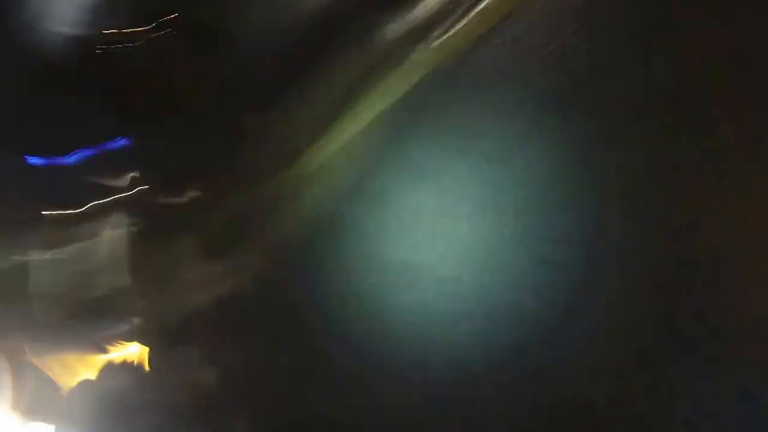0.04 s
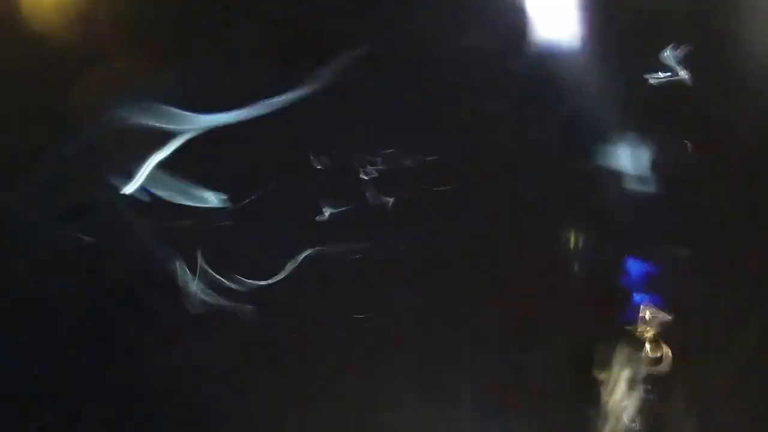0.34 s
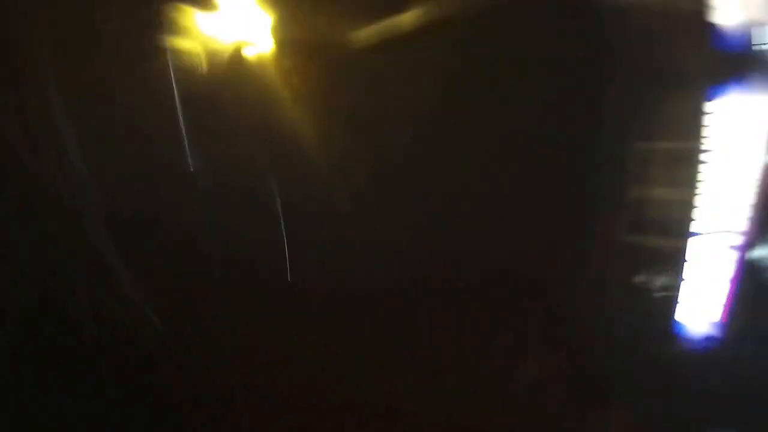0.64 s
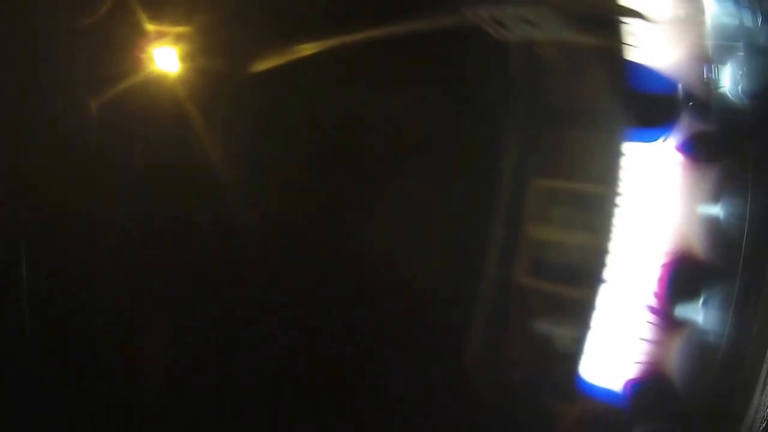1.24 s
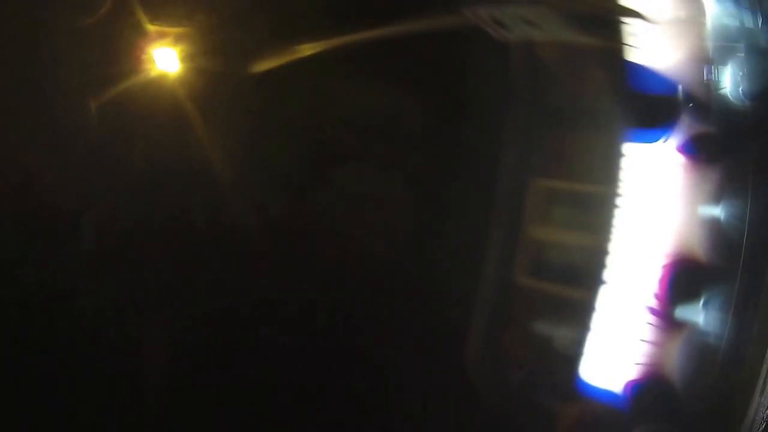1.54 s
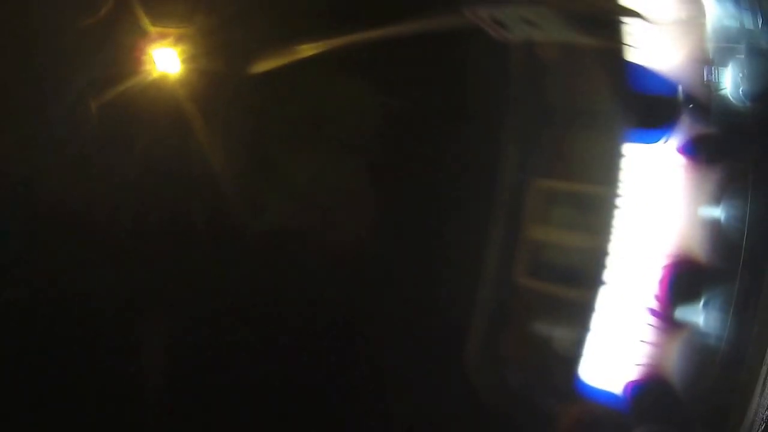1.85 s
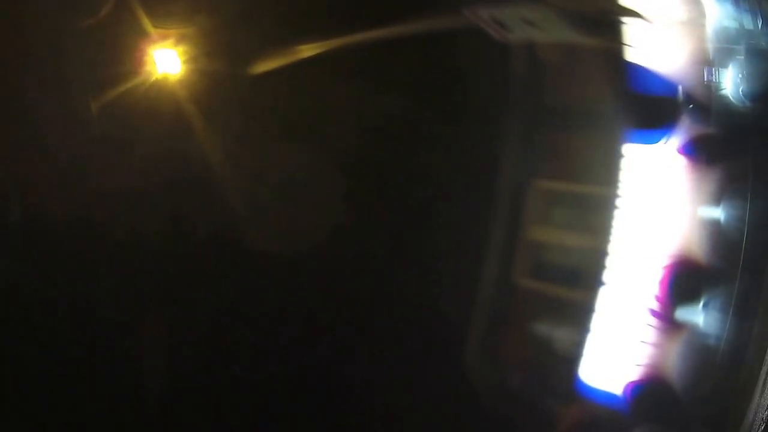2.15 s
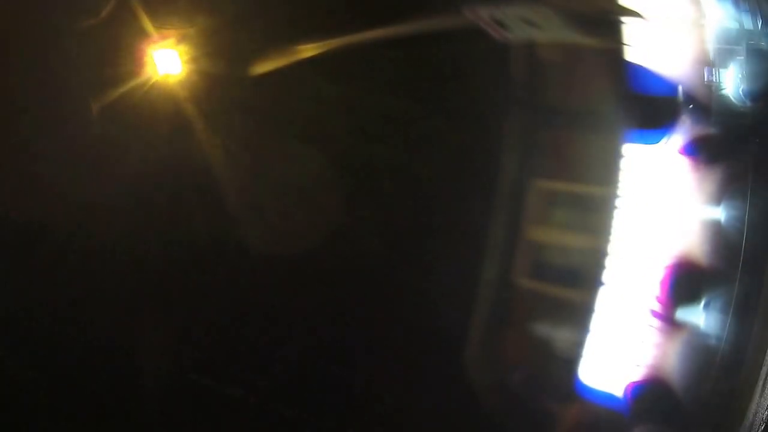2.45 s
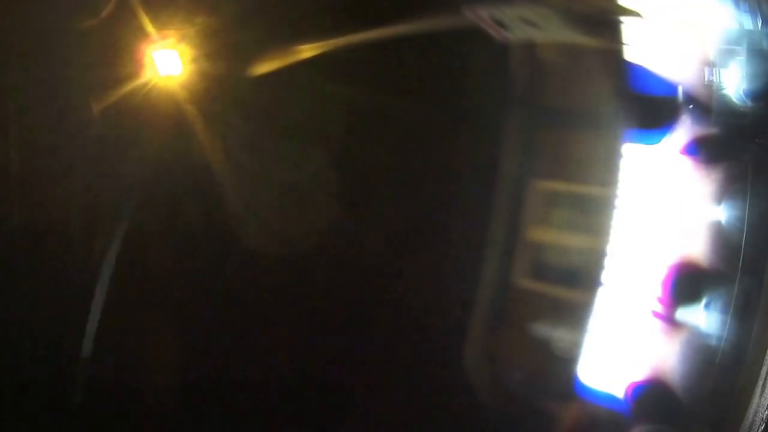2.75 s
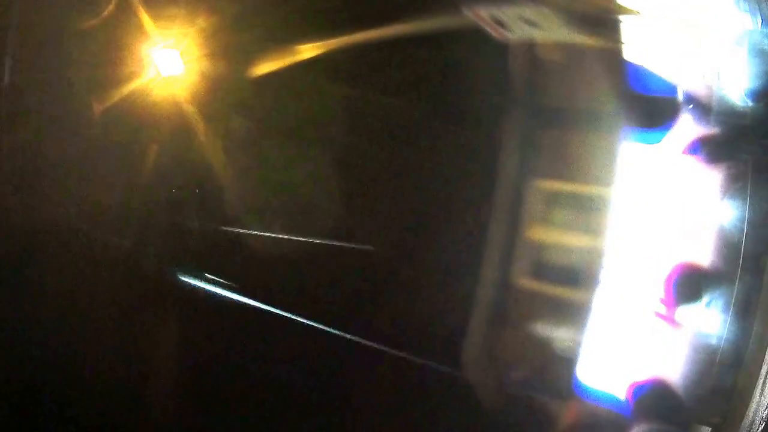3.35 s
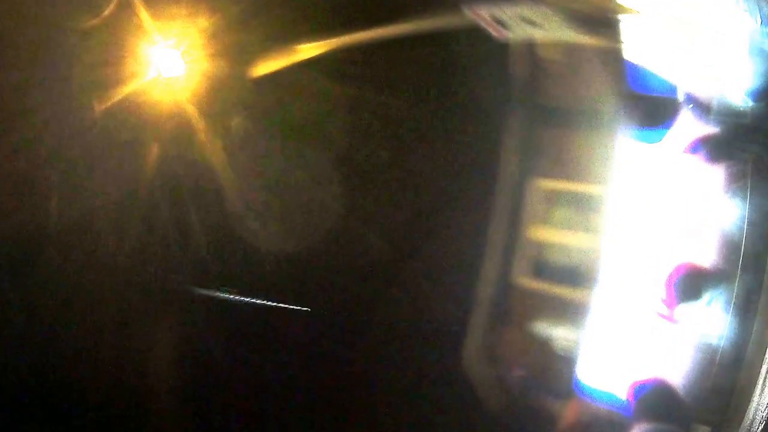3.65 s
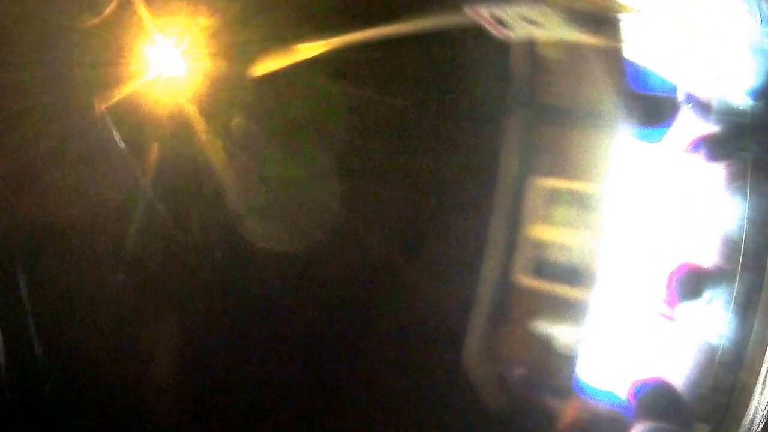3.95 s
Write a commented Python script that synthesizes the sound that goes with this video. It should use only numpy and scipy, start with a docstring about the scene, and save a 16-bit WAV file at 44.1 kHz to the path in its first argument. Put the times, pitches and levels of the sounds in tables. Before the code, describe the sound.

A bicycle crashes with loud thuds, clattering and scraping, leaving faint distant traffic.

```python
"""A bicycle carrying a camera crashes on a road at night. A brake howls for an instant, then bike and
camera tumble: heavy hits thud, the plastic case knocks and rings, grit scrapes and loose parts shudder,
all sliding to rest in about a second. A wheel ticks softly as it slows, and faint traffic is left:
tyres, a distant motor's drone, one engine rising and falling, and a thin high chirping."""
import sys
import numpy as np
from scipy import signal
from scipy.fft import rfft, irfft, next_fast_len
from scipy.io import wavfile
from scipy.ndimage import uniform_filter1d, map_coordinates

SR = 44100
rng = np.random.default_rng(int(sys.argv[2]) if len(sys.argv) > 2 else 0)


def store_pcm(level_fs):
    """Save levels as 16-bit WAV."""
    pcm = np.round(np.clip(level_fs, -1, 1) * 32767).astype(np.int16)
    wavfile.write(sys.argv[1], SR, np.atleast_2d(pcm).T)


N = 176400


def amp(db):
    """Turn decibels into a number to multiply by."""
    return 10 ** (np.asarray(db) / 20)


def unit(x):
    """Scale x to an average strength (rms) of 1."""
    return x / np.sqrt(np.mean(x ** 2) + 1e-20)


def clock(seconds=N / SR):
    """The time of each sample."""
    return np.arange(round(seconds * SR)) / SR


def curves(rows):
    """Join a table's rows with straight lines: one curve for each column after the time."""
    times, *columns = np.transpose(rows)
    return [np.interp(clock(), times, column) for column in columns]


def wobble(rate):
    """A smooth random curve through `rate` points a second."""
    return map_coordinates(rng.standard_normal(N // 8), [clock() * rate], mode="wrap")


def colour(x, tone):
    """Make each pitch in x louder or softer as a tone table says, at strength 1."""
    pitches, db = np.transpose(tone)
    hz = np.fft.rfftfreq(N, 1 / SR)
    gain = amp(np.interp(np.log(hz + 1), np.log(pitches), db))
    return unit(irfft(rfft(x) * gain, N))


def noise(tone):
    """Noise shaped by a tone table."""
    return colour(rng.standard_normal(N), tone)


def fuzzy_note(hz, width):
    """A narrow band of noise around a steady or sliding pitch."""
    phase = 2 * np.pi * np.cumsum(hz * np.ones(N)) / SR
    return unit(wobble(width) * np.sin(phase) + wobble(width) * np.cos(phase))


def grains(per_s, spread_db):
    """Tiny clicks of uneven size at random times."""
    clicks = (rng.random(N) < per_s / SR) * rng.choice([-1, 1], N)
    return unit(clicks * amp(spread_db * rng.standard_normal(N)))


def patchy(x, depth_db):
    """Let random patches of time and pitch swell and sink."""
    spectrum = signal.stft(x, nperseg=512)[2]
    patches = uniform_filter1d(rng.standard_normal(spectrum.shape), size=4, axis=0)
    patches = unit(uniform_filter1d(patches, size=8, axis=1))
    return unit(signal.istft(spectrum * amp(depth_db * patches), nperseg=512)[1][:N])


def fade(t, fade_s):
    """Die away by 60 dB in fade_s seconds."""
    return amp(-60 * t / fade_s)


def ring(t, hz, fade_s):
    """A pure note that dies away."""
    return fade(t, fade_s) * np.sin(2 * np.pi * hz * t)


def burst(x, shape):
    """Make noise x follow a loudness shape and match its strength."""
    return unit(x * shape) * np.sqrt(np.mean(shape ** 2))


def add(track, s, sound):
    """Mix a sound into the track at s seconds."""
    part = track[max(round(s * SR), 0):][:len(sound)]
    part += sound[:len(part)]


def brake_howl(hz=397.5, db=-25.5, hold_s=0.024, release_s=0.019):
    """The brake howls on one note until the first blow."""
    t = clock()
    return amp(db) * np.sin(2 * np.pi * hz * t) * np.exp(-np.maximum(t - hold_s, 0) / release_s)


# Tone of far tyres, their wet swish and the deep rumble (pitch [Hz], level [dB])
TYRE_TONE = [(40, 5.5), (120, 4), (250, 0), (420, -6.5), (520, -4), (750, -3.5), (1100, -10.5),
             (1800, -13.5), (2600, -34), (4000, -33), (8000, -51)]
SWISH_TONE = [(1200, -17.5), (1800, 3.5), (2500, -2), (3700, -7), (4600, -13), (7000, -19.5)]
RUMBLE_TONE = [(8, 3.5), (25, 14.5), (40, -3.5), (55, 1.5), (80, -6.5), (200, -59.5)]
# How loud each one is (time [s], level [dB])
TYRE_LEVEL = [(0, -47), (1.1, -69), (1.4, -66), (1.72, -72.5), (2.0, -66), (2.35, -63.5), (2.8, -66.5),
              (3.2, -65.5), (3.6, -63), (4, -61.5)]
SWISH_LEVEL = [(1, -98), (1.8, -88), (2.5, -79), (2.9, -88), (3.2, -86), (3.5, -79.5), (4, -84)]
RUMBLE_LEVEL = [(0, -39), (1.05, -49.5), (1.5, -53), (2.3, -55), (3.1, -54), (3.6, -51.5), (4, -49)]
def traffic():
    """Far tyres rush and swish on the damp road, over a deep rumble."""
    tyres = patchy(noise(TYRE_TONE), depth_db=2.2) * amp(curves(TYRE_LEVEL)[0] + wobble(15))
    swish = noise(SWISH_TONE) * amp(curves(SWISH_LEVEL)[0] + 1.7 * wobble(8.4))
    rumble = noise(RUMBLE_TONE) * amp(curves(RUMBLE_LEVEL)[0])
    return tyres + swish + rumble


# The motor's notes (pitch [Hz], width [Hz], level [dB])
DRONE_NOTES = [(121, 4.7, -79), (179, 3.8, -76), (251, 30, -71.5), (303, 37, -72), (348.4, 37, -69.5),
               (486, 36, -82.5)]
def drone():
    """A distant motor hums on a few fuzzy notes."""
    return sum(amp(db) * fuzzy_note(hz, width) for hz, width, db in DRONE_NOTES)


# How loud the sliding is (time [s], level [dB])
SCRAPE_LEVEL = [(.018, -75), (.026, -22.5), (.08, -25.5), (.12, -22.5), (.16, -24), (.22, -19.5),
                (.27, -28), (.335, -32), (.38, -21), (.43, -27.5), (.49, -36.5), (.55, -34), (.595, -49.5),
                (.67, -47.5), (.705, -42), (.75, -33.5), (.83, -41.5), (.875, -44.5), (.9, -48.5),
                (1.0, -64.5)]
# Tone of coarse and fine grit (pitch [Hz], level [dB])
GRIT_TONE = [(25, 4.5), (60, 8.5), (130, 13), (200, 10), (300, 6), (430, 2), (620, -12), (1100, -15.5),
             (1750, -24), (2600, -25.5), (3500, -41.5), (6000, -58), (9000, -60), (12000, -83),
             (16000, -96)]
CRUNCH_TONE = [(2000, -21), (3400, 3.5), (4400, 3.5), (6000, -6), (8800, -6), (11500, -16.5),
               (13000, -48.5)]
def scrape():
    """Road grit catches on the sliding bike, with a fine crunch on top."""
    drag = colour(grains(per_s=1600, spread_db=0.5) + 0.27 * rng.standard_normal(N), GRIT_TONE)
    crunch = amp(-43) * colour(grains(per_s=3300, spread_db=5), CRUNCH_TONE)
    judder_db = 2 * wobble(70)
    return patchy(drag + crunch, depth_db=2) * amp(curves(SCRAPE_LEVEL)[0] - judder_db)


# Hard hits (time [s], body [dB], clack [dB], crack [dB], pitch of the struck spot [Hz])
HARD_HITS = [(0.0205, -12.5, -13, -39.5, 1033), (.027, -16.5, -27, -46.5, 980),
             (0.0364, -16, -20.5, -50.5, 1246), (0.055, -15.5, -20.5, -49, 1074),
             (.088, -21, -24.5, -46, 1200), (.095, -15.5, -24.5, -48.5, 1290),
             (0.109, -43, -27.5, -48.5, 2490), (0.113, -17, -26, -44.5, 1400),
             (0.133, -17, -23.5, -56, 1226), (0.138, -32.5, -28, -65, 1050), (.164, -22, -26.5, -64, 1030),
             (0.176, -20.5, -21.5, -39, 920), (.179, -13, -19, -38, 970), (0.184, -27, -23, -44, 1957),
             (.193, -14.5, -22, -49, 885), (0.2137, -14, -18, -41.5, 894), (0.233, -18, -27, -62, 2110),
             (0.257, -24.5, -28, -72, 1310), (0.276, -29, -32, -59, 2080), (.309, -29, -35.5, -51.5, 1120),
             (.351, -18.5, -34, -51.5, 687), (.364, -22.5, -25, -56, 926), (0.373, -18.5, -27, -55, 2120),
             (.382, -24.5, -43.5, -58, 920), (0.397, -11, -21.5, -41, 2425), (.408, -12, -27, -55, 1126),
             (0.418, -21.5, -30.5, -50.5, 1510), (0.427, -18, -28.5, -56, 701), (.449, -22, -30, -54, 1080),
             (.505, -36, -56.5, -51.5, 1496), (0.509, -37, -34.5, -45, 1470),
             (0.518, -41, -36.5, -52, 1420), (.611, -38.5, -48.5, -59, 1470), (.629, -38, -47, -68, 1000),
             (0.6594, -28, -40, -55, 1845), (0.673, -39, -37, -60, 1260), (.732, -46, -45, -60, 1990),
             (.744, -31.5, -40.5, -60, 820), (.754, -34, -41, -55, 1030), (0.764, -31, -42, -63, 1010),
             (0.775, -46, -44.5, -63, 2010), (.803, -50, -47, -66, 2040), (0.82, -41, -48, -65, 2090),
             (.829, -41, -41, -62, 1570), (.878, -55, -48, -77, 1050)]
# Tone of a knock's three parts (pitch [Hz], level [dB])
BODY_TONE = [(80, -1), (150, 9.5), (210, 5.5), (300, 8), (450, 1), (700, -8), (1200, -32.5), (3000, -66)]
CLACK_TONE = [(300, -17.5), (700, 6), (1000, 7.5), (1300, -1.5), (1750, -1), (2050, -4.5), (2600, -7),
              (3100, -10.5), (3700, -48), (8000, -62.5)]
CRACK_TONE = [(1500, -18.5), (3200, 6.5), (4500, 1), (6500, -7.5), (8800, -6), (11000, -24), (12500, -27.5),
              (14000, -50)]
# Notes the camera case rings on (pitch [Hz], relative level [dB], fade time [s])
CASE_NOTES = [(255.3, -1.5, 0.22), (503.7, -8, 0.16), (615, -5, 0.056), (863, -14.5, 0.074),
              (1039, -9.5, 0.028), (1103, -6, 0.075), (1500, -17, 0.055), (1544, -10.5, 0.099),
              (2042, -13, 0.0557)]
def knocks(rise_s=0.0016, boost_db=11.5, boost_octaves=0.15, detune=0.016, ring_db=-9.5):
    """Each hard hit has a hollow body, a ringing plastic clack and a thin crack."""
    out, t = np.zeros(N), clock(.2)
    rise = 1 - np.exp(-t / rise_s)
    noises = [noise(BODY_TONE), noise(CLACK_TONE), noise(CRACK_TONE)]
    for s, body_db, clack_db, crack_db, spot_hz in HARD_HITS:
        start = rng.integers(N - len(t))
        body, clack, crack = [x[start:start + len(t)] for x in noises]
        # The struck spot brings out its own pitch.
        octaves = np.log2((np.fft.rfftfreq(len(t), 1 / SR) + 1) / spot_hz)
        boost = amp(boost_db * np.exp(-(octaves / boost_octaves) ** 2))
        clack = irfft(rfft(clack) * boost, len(t))
        for x, db, fade_s in (body, body_db, 0.055), (clack, clack_db, 0.021), (crack, crack_db, 0.02):
            add(out, s, amp(db) * burst(x, rise * fade(t, fade_s)))
        ringing = ring(t, spot_hz, fade_s=0.037)
        for hz, db, fade_s in CASE_NOTES:  # each hit strains the case differently
            strength = rng.choice([-1, 1]) * amp(db + rng.normal(0, 2))
            ringing += strength * ring(t, hz * (1 + detune * rng.standard_normal()), fade_s)
        add(out, s, amp(clack_db + ring_db) * rise * ringing)
    return out


# Heavy hits felt through the camera mount (time [s], peak level [dB], contact time [s])
HEAVY_HITS = [(0.027, -15, 0.0021), (.066, -27, 0.0019), (0.105, -15.5, 0.0068), (0.122, -13, 0.0017),
              (.18, -9, 0.00053), (.197, -11.5, 0.0042), (0.216, -12, 0.0025), (0.2277, -8, 0.0024),
              (0.258, -25, 0.0018), (0.27, -19.5, 0.0027), (0.305, -25.5, 0.0032), (0.328, -28.5, 0.0023),
              (.352, -13.5, 0.00079), (.3565, -14.5, 0.00096), (0.366, -12.5, 0.0025), (.378, -13, 0.0021),
              (0.397, -21.5, 0.0027), (0.407, -20.5, 0.00088), (0.428, -13.5, 0.0024), (.511, -27.5, 0.003),
              (0.544, -22, 0.004), (0.645, -27.5, 0.0057), (0.718, -16.5, 0.002), (.733, -23, 0.0015),
              (0.7397, -13.5, 0.0015), (.756, -18, 0.004), (.776, -17.5, 0.0017)]
def thuds(half_s=.03):
    """Each heavy hit shoves the microphone out and back; softer contacts last longer."""
    out = np.zeros(N)
    for s, db, contact_s in HEAVY_HITS:
        u = (clock(2 * half_s) - half_s) / (2 * contact_s)
        push = amp(db) * (1 - 2 * u * u) * np.exp(-u * u)
        before_zero = max(round((half_s - s) * SR), 0)
        add(out, s - half_s, push[before_zero:])
    return out


# The hardest hits (time [s], shove [dB], ping pitch [Hz], ping [dB], ping fade time [s])
HARDEST_HITS = [(.0272, -11, 2100, -25.5, .008), (.088, -25, 1200, -22.5, .03),
                (.1792, -9.5, 4400, -32.5, .005), (.1845, -25, 2050, -24.5, .016),
                (.1966, -20, 900, -23, .012), (.2145, -3, 900, -16.5, .012),
                (.3985, -22.5, 2450, -12, 0.0078), (.408, -13.5, 1900, -24, .006),
                (.4175, -16, 1550, -26.5, .01), (.428, -17.5, 700, -23.5, .01),
                (.4495, -19, 1100, -32, .012)]
def blows(shove_s=0.00083, shove_rise_s=.00022, ping_rise_s=0.00067):
    """The hardest hits jolt the case and make the struck spot ping."""
    out, t = np.zeros(N), clock(.06)
    shove_rise = 1 - np.exp(-(t / shove_rise_s) ** 2)
    shove = shove_rise * (1 - t / shove_s) * np.exp(-t / shove_s)
    ping_rise = 1 - np.exp(-(t / ping_rise_s) ** 2)
    for s, shove_db, hz, ping_db, fade_s in HARDEST_HITS:
        add(out, s, amp(shove_db) * shove + amp(ping_db) * ping_rise * ring(t, hz, fade_s))
    return out


# Sharp clicks (time [s], level [dB], fade time [s])
CLICKS = [(0.0278, -33, 0.0024), (0.1796, -30.5, 0.0014), (0.3513, -44.5, 0.0035), (.367, -51.5, .004),
          (.409, -45, 0.0014), (.504, -48, .003), (.51, -48, 0.0047), (0.7323, -49.5, .0016),
          (.7393, -49.5, 0.0018), (0.7456, -53, .002), (0.7674, -48, 0.0012), (0.7763, -56, .0014),
          (.823, -64.5, .012), (.831, -62, 0.0088), (.882, -63.5, .002), (1.354, -57.5, 0.014),
          (1.364, -67, .022), (1.392, -77, .04)]
# Their tone (pitch [Hz], level [dB])
CLICK_TONE = [(800, -3), (2000, -5), (4000, -10), (6000, -8.5), (9000, -7.5), (12000, -16), (13500, -33.5)]
def clicks():
    """Stones strike the case; something small settles after the bike stops."""
    out, t = np.zeros(N), clock(.1)
    for s, db, fade_s in CLICKS:
        add(out, s, amp(db) * burst(rng.standard_normal(len(t)), fade(t, fade_s)))
    return colour(out, CLICK_TONE) * np.std(out)


# Loose parts swinging (time [s], pitch [Hz], peak level [dB], length [s])
SWINGS = [(0.034, 317, -16.5, .05), (.396, 101.8, -8.5, 0.096), (0.496, 99.4, -32, 0.22),
          (0.743, 270.6, -34, .09), (0.787, 53.1, -25, 0.19)]
def shudders():
    """Frame and camera mount swing after big blows until rubbing stops them."""
    out = np.zeros(N)
    for s, hz, db, length in SWINGS:
        t = clock(length)
        add(out, s, amp(db) * (1 - t / length) * np.sin(2 * np.pi * hz * t))
    return out


def squeak(start_s=.469, length_s=0.0072, from_hz=5060, to_hz=6200, db=-55):
    """A slipping contact gives one tiny rising squeak."""
    out, n = np.zeros(N), len(clock(length_s))
    hz = np.linspace(from_hz, to_hz, n) * (1 + .035 * wobble(920)[:n])
    add(out, start_s, amp(db) * signal.windows.tukey(n, .5) * np.sin(2 * np.pi * np.cumsum(hz) / SR))
    return out


# The last slide (time [s], pitch [Hz], level [dB])
SLIDE = [(.8, 1120, -63), (.87, 1028, -58), (.92, 930, -53.5), (.97, 827, -59.5), (1.02, 757, -64),
         (1.05, 735, -72)]
# Its notes (multiple of the pitch [x], width [Hz], relative level [dB])
SLIDE_NOTES = [(.7, 298.3, -6), (1, 110, -3.5), (1.2, 299.7, -7)]
# The case rasping (time [s], level [dB])
RASP_LEVEL = [(.8, -84), (.87, -90), (.945, -81), (.975, -105)]
def last_slide():
    """The bike catches and slips, falling in pitch as it stops."""
    hz, db = curves(SLIDE)
    sliding = (clock() > SLIDE[0][0]) & (clock() < SLIDE[-1][0])
    rub = amp(db) * sum(amp(level) * fuzzy_note(k * hz, width) for k, width, level in SLIDE_NOTES)
    rasp = amp(curves(RASP_LEVEL)[0]) * fuzzy_note(hz=2900, width=270)
    catching = amp(wobble(240))
    return sliding * (rub + rasp) * catching


# How loud the chirping is (time [s], level [dB])
CHIRP_LEVEL = [(1, -101), (2.4, -94), (3.2, -88), (4, -85)]
def chirping(hz=7100, scatter_hz=140, rise_hz_per_s=4500, length_s=0.063, per_s=15.57):
    """Quick, thin, rising chirps run together and slowly grow louder."""
    bend_hz, swell, t = np.zeros(N), np.zeros(N), clock(length_s)
    for s in np.arange(1, N / SR * per_s) / per_s - length_s / 2:
        pitch, size = rng.standard_normal(2)
        add(bend_hz, s, scatter_hz * pitch + rise_hz_per_s * (t - length_s / 2))
        add(swell, s, amp(0.5 * size) * np.hanning(len(t)))
    chirps = unit(swell * fuzzy_note(hz + bend_hz, width=340))
    ringing = amp(-12) * fuzzy_note(hz=7360, width=260)
    blur = amp(-6) * fuzzy_note(hz, width=700)
    return (chirps + ringing + blur) * amp(curves(CHIRP_LEVEL)[0])


# Soft wheel ticks, then later throbs (time [s], level [dB])
SOFT_TICKS = [(1.085, -56), (1.179, -56.5), (1.26, -54.5), (1.359, -58.5), (1.47, -57.5), (1.56, -59.5),
              (1.672, -58.5), (1.79, -60.5), (1.9, -60.5), (2.22, -70), (2.8, -69), (3.39, -80),
              (3.481, -69), (3.592, -60)]
# Their notes (pitch [Hz], width [Hz], relative level [dB])
TICK_NOTES = [(191, 8.6, -7), (259, 20, -9), (317, 15, -2), (542, 17, -11.5)]
# Tone of the rush in them (pitch [Hz], level [dB])
TICK_TONE = [(150, -8), (500, 9.5), (800, -4), (1100, 7), (1800, -33), (2600, -39), (6000, -41)]
def wheel_ticks(length_s=0.071):
    """The wheel ticks softly as it slows; a few faint throbs follow later."""
    swell = np.zeros(N)
    for s, db in SOFT_TICKS:
        add(swell, s - length_s / 2, amp(db) * np.hanning(len(clock(length_s))))
    notes = sum(amp(db) * fuzzy_note(hz, width) for hz, width, db in TICK_NOTES)
    return swell * (notes + amp(-11) * noise(TICK_TONE))


# The engine's run (time [s], firing rate [Hz], level [dB])
ENGINE_RUN = [(1.8, 42.2, -77), (2.0, 56.6, -59), (2.12, 61.85, -62), (2.24, 61.8, -57.5),
              (2.41, 57.2, -53.5), (2.63, 50.33, -67), (2.9, 35.17, -62), (3.15, 30.1, -77.5)]
# Its notes (multiple of the firing rate [x], relative level [dB])
ENGINE_NOTES = [(1, 1.5), (2, -25), (3, -19.5), (4, -28.5), (8, -26.5)]
# Its whine (time [s], pitch [Hz], level [dB])
ENGINE_WHINE = [(1.95, 650, -96.5), (2.06, 670, -76.5), (2.2, 681, -70), (2.32, 674, -74), (2.43, 660, -97)]
def engine():
    """One engine speeds up and falls back, whining faintly at its fastest."""
    hz, db = curves(ENGINE_RUN)
    whine_hz, whine_db = curves(ENGINE_WHINE)
    phase = 2 * np.pi * np.cumsum(hz) / SR
    firing = sum(amp(level) * np.sqrt(2) * np.sin(k * phase) for k, level in ENGINE_NOTES)
    return amp(db) * firing + amp(whine_db) * fuzzy_note(whine_hz, width=6.9)


# How loud the whistle is (time [s], level [dB])
WHISTLE_LEVEL = [(3.1, -115), (3.4, -88), (3.6, -92.5), (3.85, -105)]
def far_whistle():
    """A thin whistle comes and goes in the far traffic."""
    return fuzzy_note(hz=3680, width=490) * amp(curves(WHISTLE_LEVEL)[0])


def scene():
    """The crash at the camera, with the street behind it."""
    hits = knocks() + thuds() + blows()
    crash = brake_howl() + scrape() + hits + clicks() + shudders() + squeak() + last_slide()
    faint = traffic() + drone() + chirping() + wheel_ticks() + engine() + far_whistle()
    return (crash + faint)[None]


# Tone of the camera's hiss (pitch [Hz], level [dB])
HISS_TONE = [(1500, 1.5), (3500, -2), (6000, -3), (8500, -1.5), (12500, -5.5), (14000, -5.5),
             (16000, -14.5)]
# How loud it is (time [s], level [dB])
HISS_LEVEL = [(0, -85.5), (2, -87), (3, -85), (4, -81.5)]
def record(dry, ceiling=0.64, top_hz=15750):
    """The camera adds hiss, rounds off the biggest peaks and cuts the highest treble."""
    x = dry + noise(HISS_TONE) * amp(curves(HISS_LEVEL)[0])
    x = x / (1 + abs(x / ceiling) ** 6) ** (1 / 6)
    padded = next_fast_len(N + SR)
    kept = np.fft.rfftfreq(padded, 1 / SR) < top_hz
    return irfft(rfft(x, padded) * kept, padded)[:, :N]


dry = scene()
out = record(dry)
store_pcm(out)
```